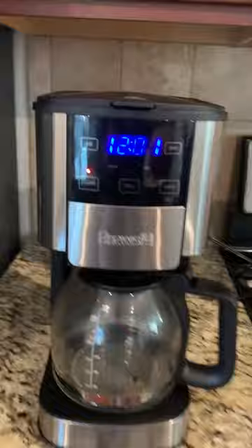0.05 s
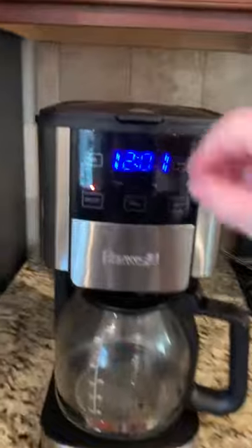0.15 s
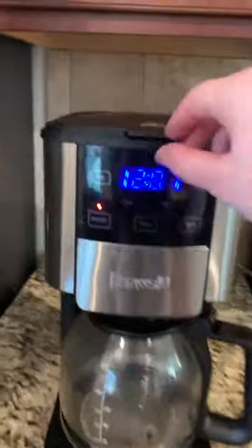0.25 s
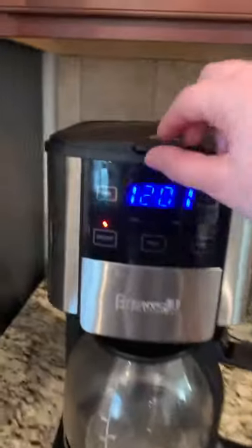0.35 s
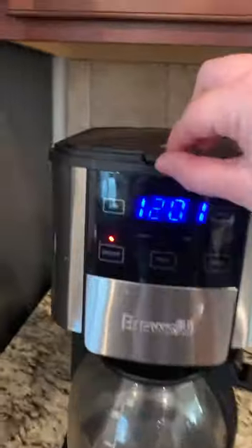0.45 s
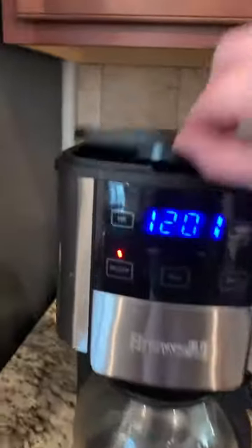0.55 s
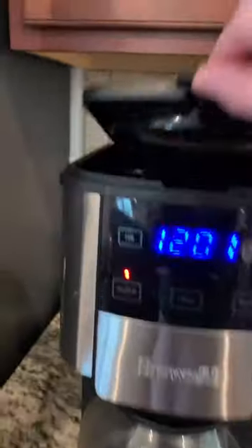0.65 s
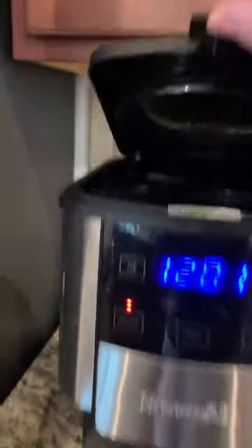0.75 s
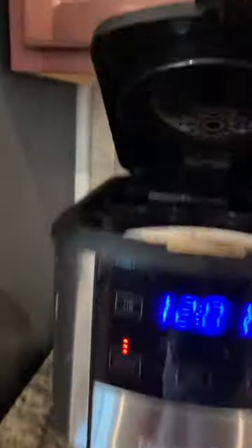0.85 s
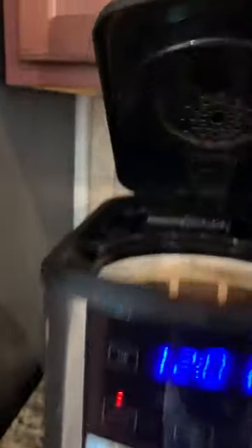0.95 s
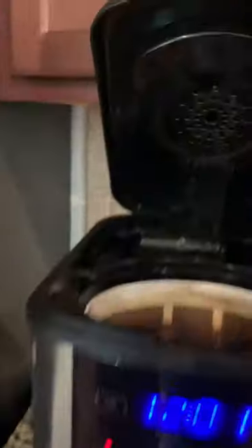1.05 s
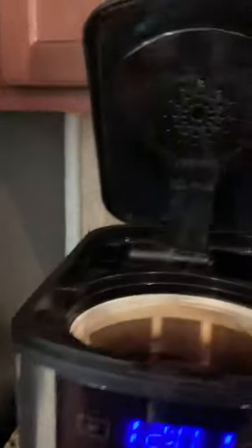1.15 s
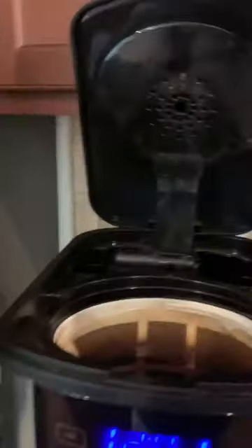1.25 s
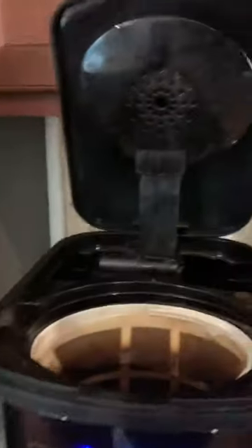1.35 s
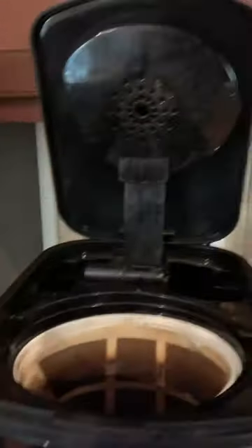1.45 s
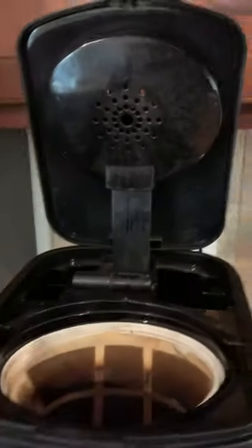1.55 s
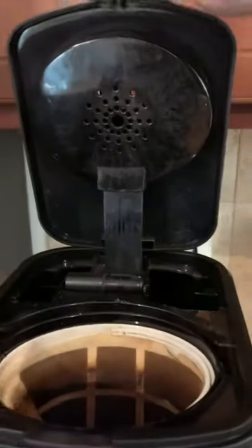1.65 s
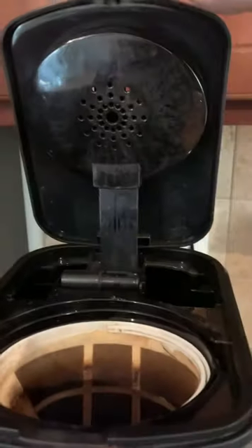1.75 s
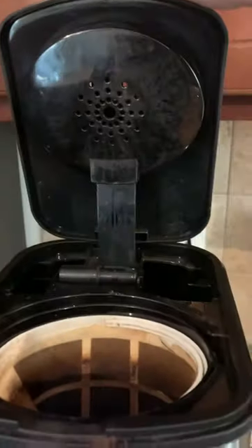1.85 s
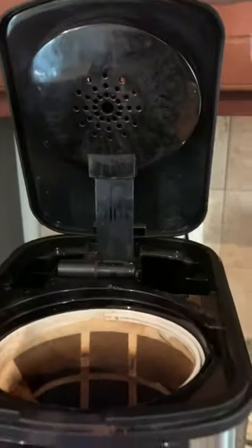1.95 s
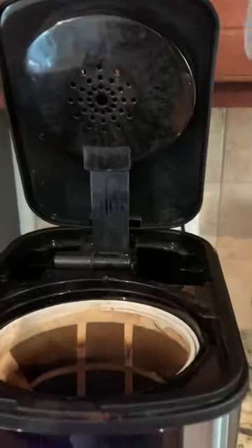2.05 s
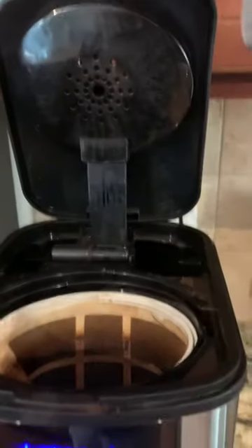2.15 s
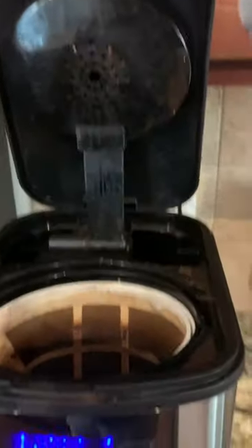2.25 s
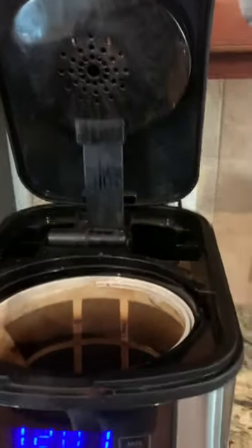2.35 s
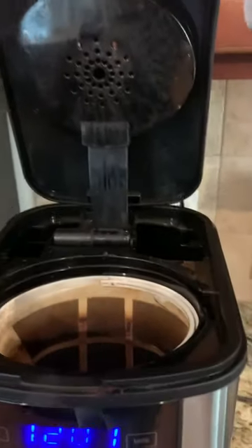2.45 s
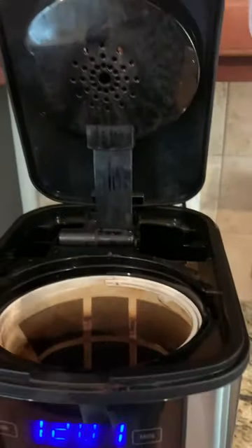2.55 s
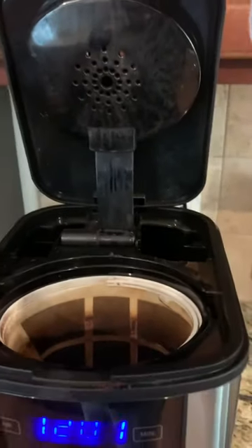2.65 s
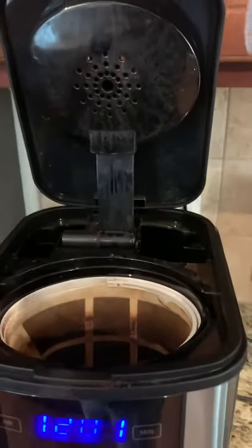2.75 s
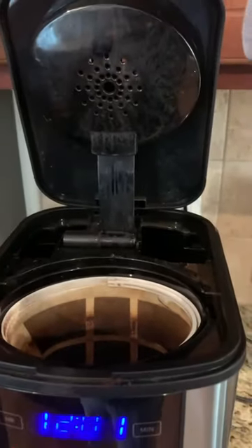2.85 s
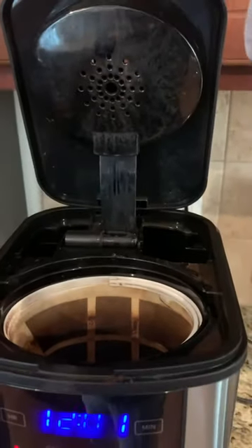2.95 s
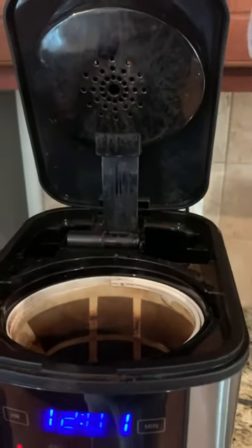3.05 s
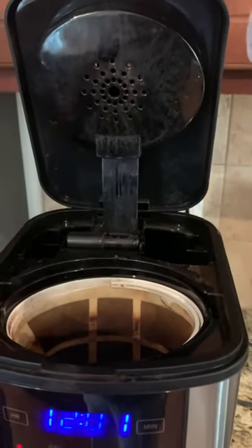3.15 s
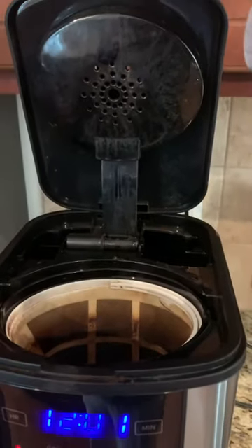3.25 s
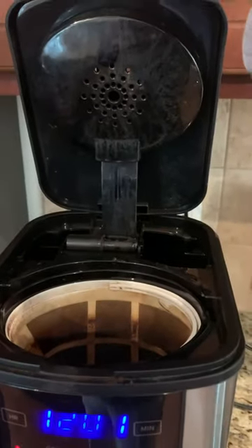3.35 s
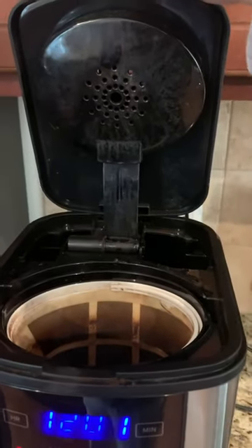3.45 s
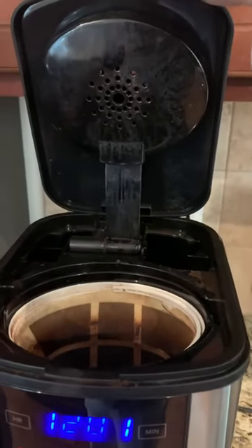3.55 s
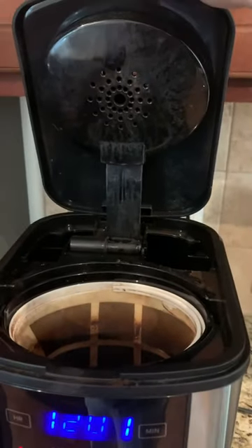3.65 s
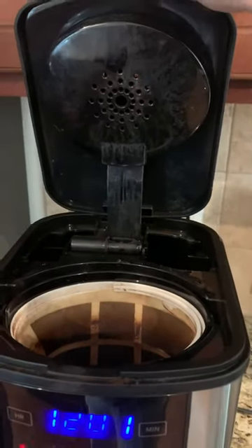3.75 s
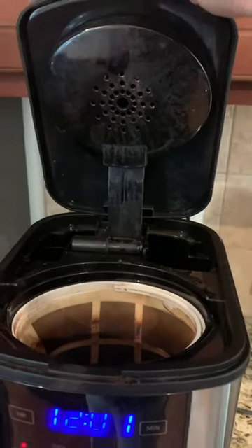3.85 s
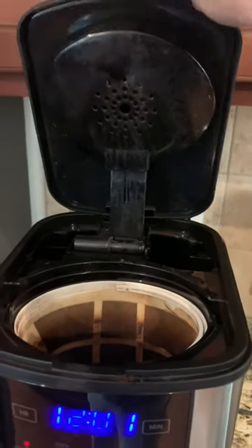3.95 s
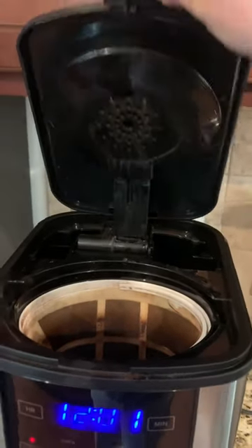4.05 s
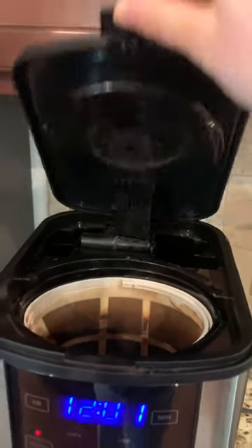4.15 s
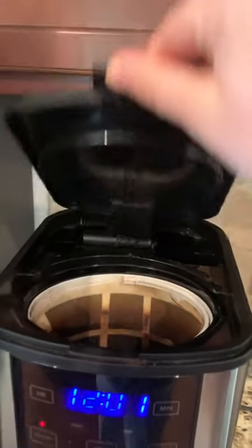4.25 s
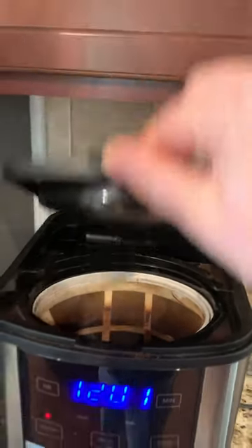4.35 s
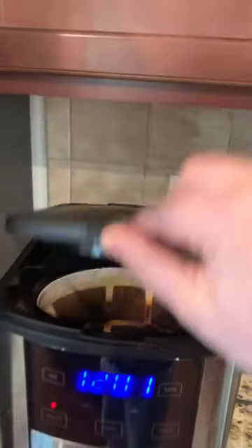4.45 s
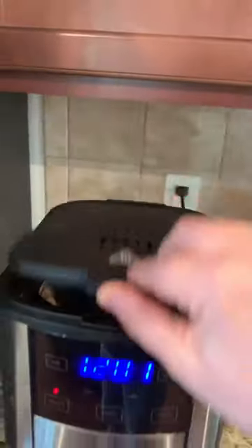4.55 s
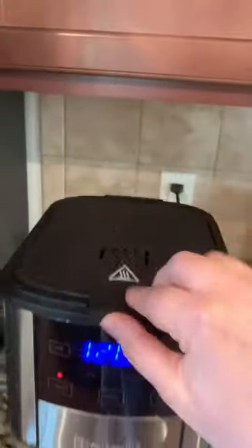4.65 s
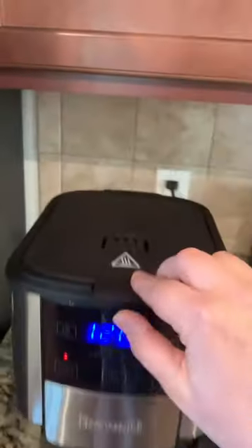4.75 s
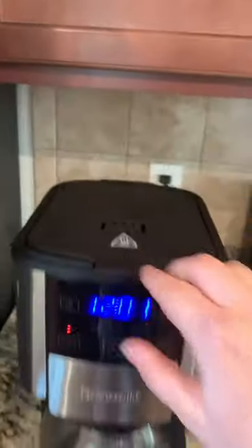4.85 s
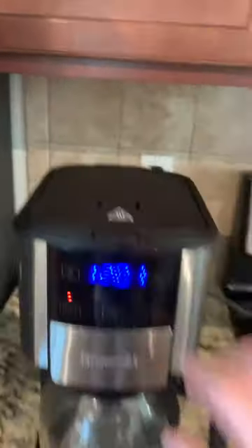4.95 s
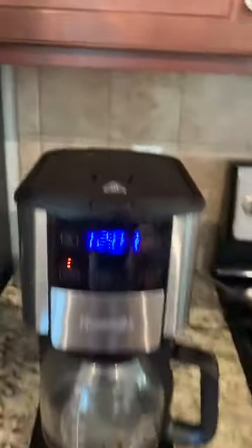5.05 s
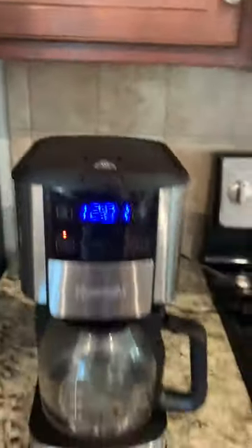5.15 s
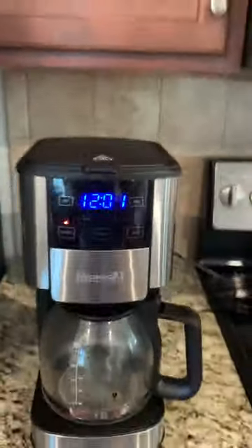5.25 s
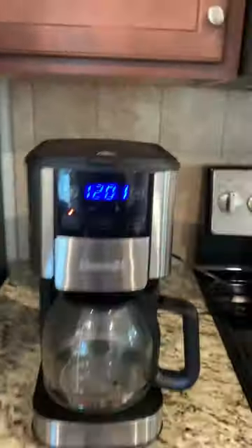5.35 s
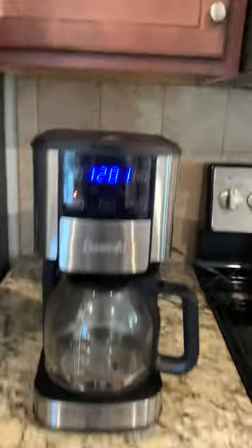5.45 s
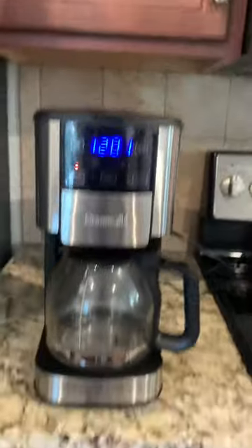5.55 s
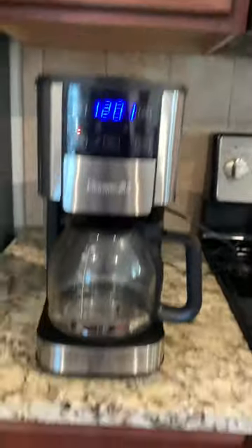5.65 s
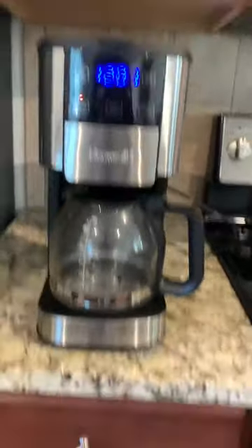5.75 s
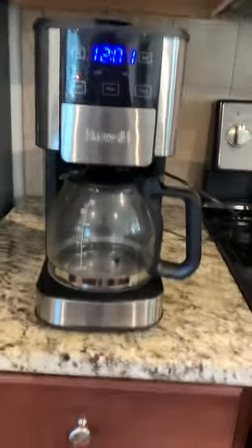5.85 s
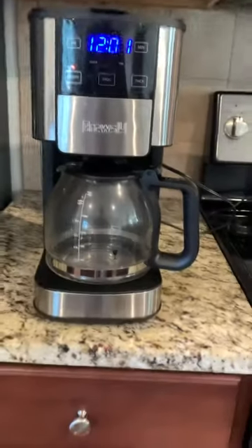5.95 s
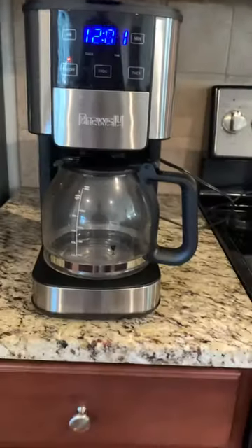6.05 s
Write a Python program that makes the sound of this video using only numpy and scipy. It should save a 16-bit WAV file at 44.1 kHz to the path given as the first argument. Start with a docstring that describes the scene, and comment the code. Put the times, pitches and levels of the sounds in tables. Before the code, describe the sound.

Light plastic cracks, a few dull floor thuds with thin metallic clinks, then a sharp lid clack, over quiet refrigerator hum and room rumble.

```python
"""Opening and shutting a coffee machine lid

The plastic lid of a kitchen coffee machine is unlatched, lifted and shut in front of a hand-held phone: short
cracks ring its hollow shell. Feet thud (gliding tones) and scuff (shaped noise) on the floor, and a loose
metal part clinks (ringing tones). A fridge hums (wavering tones) under the rumble of the house (noise)."""
import sys
import numpy as np
from scipy import signal
from scipy.fft import rfft, irfft, next_fast_len
from scipy.io import wavfile
from scipy.ndimage import uniform_filter1d, map_coordinates

SR = 44100
rng = np.random.default_rng(int(sys.argv[2]) if len(sys.argv) > 2 else 0)


def gain_from_decibels(decibels):
    """Convert decibel values to linear amplitude factors."""
    exponent = np.asarray(decibels, float) / 20
    return 10 ** exponent


def transcribe(u):
    """Save the signal u as a 16-bit wav file named by the first command-line argument.

    u: samples, shape (n,) or (channels, n), limited to [-1, 1]; the rate is SR.
    q: integer samples, one column per channel.
    """
    v = np.clip(np.atleast_2d(u).T, -1, 1)
    q = np.round(v * 32767).astype(np.int16)
    wavfile.write(sys.argv[1], SR, q)


N = 268745  # length in samples
T = np.arange(N) / SR  # time of each sample in seconds

# contacts of latch, hinge and lid: t/s, level/dB, body/dB, treble/dB, time for the crack to fall 60 dB/s
CONTACTS = [(0.129, -52, -23, -15, 0.011), (0.157, -66, -10, -24, 0.017), (.403, -40, -2.5, -27, 0.0092),
            (0.5049, -29.5, -3.5, -6.5, 0.043), (.573, -37, 1, -21.5, 0.026),
            (.649, -58.5, -7.5, -1, 0.013), (1.563, -37, 4.5, -49, 0.0026), (3.842, -55.5, 6.5, -26, .025),
            (3.911, -48.5, 10.5, -30.5, 0.075), (3.939, -24, -7, -9.5, 0.028),
            (3.953, -20, -8, -1.5, 0.012), (4.6119, -36, -7.5, -4, 0.023), (4.618, -25.5, 1.5, -6, 0.023),
            (4.622, -19.5, -2.5, -3, 0.027), (4.630, -25.5, 9, -28, 0.034),
            (5.405, -51, -19.5, 13.5, 0.045)]
# resonances of the hollow lid and housing: f/Hz, level/dB, longest time to fall 60 dB/s
LID_MODES = [(273, -8, 0.1), (338.6, -3.5, 0.099), (390, -6.5, 0.1), (423, -10.5, .15),
             (659.6, -2.5, 0.071), (943, -2.5, 0.021), (1058, -3.5, 0.041), (1122, -14.5, 0.063),
             (1617, -2.5, 0.026), (2078, -1.5, 0.019), (2532, -5.5, 0.024), (3380, -21, 0.015),
             (6380, 3, 0.0077), (9200, -25, 0.014)]
# the lid swings on its hinge: start t/s, length/s, level/dB
SWINGS = [(0.614, 0.51, -71), (3.978, 0.42, -68.5)]
# colour of the hinge whisper: f/Hz, relative level/dB
HINGE_COLOUR = [(600, -33), (1100, -4.5), (1700, -10.5), (2300, 5), (2900, -19), (6200, -19), (9000, -24)]
# thuds of feet and of the shut lid through floor and counter:
# t/s, level/dB, starting f above the lowest pitch/Hz, glide/s, time to fall 60 dB/s
THUDS = [(.083, -37.5, 293, .012, 0.22), (.135, -38, 251, 0.011, 0.16), (1.009, -40.5, 597, 0.028, 0.044),
         (1.013, -30.5, 197, 0.011, 0.26), (1.085, -29.5, 180, 0.01, 0.21),
         (1.206, -37.5, 535, 0.019, 0.039), (1.218, -29, 272.4, 0.0094, 0.34),
         (1.244, -23.5, 113.6, 0.042, 0.1224), (1.248, -38, 963, 0.037, 0.061),
         (1.277, -27, 90, 0.039, 0.27), (1.307, -30, 155, 0.027, 0.12), (1.949, -33, 252, 0.016, 0.35),
         (1.9854, -20, 1003, 0.0045, 0.098), (4.623, -28.5, 250, .01, .15),
         (4.821, -29.5, 617, 0.0045, 0.093), (4.827, -25, 682, 0.0038, 0.096),
         (5.003, -38, 245.7, 0.012, 0.14), (5.058, -29, 780, 0.007, 0.29),
         (5.109, -32.5, 250.7, 0.0088, 0.14)]
# small dull ticks as weight shifts on the boards: t/s, level/dB
TICKS = [(2.276, -46.5), (2.866, -53), (5.148, -48), (5.209, -47), (5.305, -52), (5.361, -46), (5.43, -48),
         (5.471, -45), (5.75, -49.5), (5.83, -51), (5.872, -53), (6.008, -50)]
TICK_HZ, TICK_GLIDE_S, TICK_T60_S = 1247, 0.00448, 0.053  # the last three THUDS columns, for every tick
# touches of the loose metal: t/s, level/dB, favoured f/Hz, loss away from it/dB per octave
CLINKS = [(1.742, -37, 1700, 14), (1.789, -39, 2600, 18), (1.979, -36.5, 5100, 6.5)]
# resonances of the metal: f/Hz, level/dB, time to fall 60 dB/s
METAL_MODES = [(1700, -5.5, 0.3), (2640, -8.5, 0.25), (3962, 0.5, 0.29), (6390, -12, 0.25), (6570, -7, .15),
               (6920, -2.5, 0.29), (7020, -5, 0.35), (8100, -1.5, 0.23), (10100, -22, 0.078),
               (11170, -10, 0.18), (13960, -14, 0.16)]
# strokes of soles, sleeves and the hinge rubbing: t of the peak/s, level/dB, swell/s, fade/s,
# brightness/dB per octave; swell and fade cover about 20 dB
STROKES = [(.14, -69.5, 0.064, 0.042, -1.5), (.265, -60, 0.089, 0.076, -6.5),
           (.62, -71.5, 0.41, 0.23, -0.5), (.92, -87.5, 0.42, 0.56, 7), (1.75, -47.5, 0.012, 0.13, 4),
           (1.81, -46.5, 0.095, 0.1, -3.5), (1.91, -50, 0.039, 0.098, -5), (1.986, -42.5, 0.01, .12, -2.5),
           (3.037, -57, 0.011, 0.073, 2), (3.115, -54, 0.082, 0.09, -6.5), (3.925, -62, .07, 0.062, -16.5),
           (4.24, -70, 0.34, 0.17, -2.5), (4.391, -68.5, 0.28, 0.061, -9.5), (5.2, -66, 0.031, 0.23, -15),
           (5.335, -50.5, 0.12, .13, -3.5)]
RUSTLE_DB, RUSTLE_BRIGHT = -80.5, -1.5  # clothes never quite still: level/dB, brightness/dB per octave
# colour of rubbing: f/Hz, relative level/dB
RUB_COLOUR = [(150, -27.5), (400, 0), (1200, 2), (1700, 5), (2600, -0.5), (4500, 0), (7000, -4),
              (9000, -13.5), (12000, -16), (16000, -28)]
# fridge tones: f/Hz, waver/Hz, relative level/dB
HUM_TONES = [(57.5, 3, -1), (235.2, 1, 2.5), (281.5, 1.5, 1.5), (322, 2, -17), (386, 2, -12),
             (462, 4, -18.5), (558, 2.25, -6.5), (3460, 9.4, -29.5), (3610, 34, -30.5), (3850, 17, -33)]
# background as the phone moves about: t/s, rumble level/dB, air level/dB, hum level/dB
HOUSE_LEVELS = [(0, -57.5, -59, -56.5), (.4, -53, -56.5, -58), (.8, -53.5, -57, -51.5),
                (1.19, -46, -60, -52), (1.45, -55.5, -57.5, -54.5), (1.95, -50.5, -58, -51),
                (2.6, -55.5, -59, -55.5), (3.8, -54, -59.5, -52), (4.12, -52.5, -54.5, -49.5),
                (4.55, -53, -56.5, -54), (5.0, -53.5, -62, -57.5), (5.35, -54.5, -59.5, -67),
                (6.09, -59, -59.5, -55.5)]
# colour of the house rumble: f/Hz, relative level/dB
RUMBLE_COLOUR = [(15, -31), (28, -9.5), (58, 6), (80, -5.5), (143, -2), (180, -6.5), (260, -8), (400, -55)]
# colour of the air noise: f/Hz, relative level/dB
AIR_COLOUR = [(150, -31), (230, 3.5), (300, 9), (430, 1), (560, -0.5), (700, -3), (860, -14.5),
              (1100, -8.5), (1350, -6.5), (1650, -26), (2500, -35), (4000, -62.5)]
# colour of the microphone hiss: f/Hz, relative level/dB
HISS_COLOUR = [(1200, -4), (2000, -8), (3400, 8.5), (5000, -7), (8000, -1), (12500, -0.5), (15300, -3.5),
               (16200, -39)]
# echo of the kitchen: f/Hz, time to fall 60 dB/s
KITCHEN = [(200, 0.38), (1000, 0.42), (4000, 0.23), (12000, 0.14)]
# left minus right for lid, thuds and clinks: level/dB
PAN_DB = [-1, 4, 0.5]
# likeness of left and right in the diffuse sound: f/Hz, likeness (1 = identical)
ALIKE = [(60, 1), (400, 0.66), (1000, 0.14), (2500, 0.58), (4500, 1), (15000, 1)]
# the phone's stereo timing: f/Hz, lead of the left side/radians
LEAD = [(0, 0.5), (800, -1.12), (1300, 1.06), (2100, 1.97), (3500, 1.5), (4700, 3), (16000, 20)]
# the phone's stereo balance: f/Hz, left minus right level/dB
TILT = [(60, -2), (500, -4), (1500, -2), (3000, -0.5), (5000, 0.5)]
# frequency response of the microphone: f/Hz, level/dB
MIC = [(20, -7), (45, -1.5), (13000, -0.5), (16500, -10.5)]


def unit(x):
    """Scaled to an rms of 1."""
    return x / np.sqrt(np.mean(x ** 2) + 1e-20)


def along(points, hz):
    """Reads (f/Hz, value) points on a log frequency axis."""
    f, v = np.transpose(points)
    return np.interp(np.log(hz + 1), np.log(f + 1), v)


def curves(rows):
    """One value per sample for each column after the time."""
    s, *columns = np.transpose(rows)
    return [np.interp(T, s, column) for column in columns]


def wobble(rate, t=T):
    """A smooth random curve with rate knots a second."""
    knots = rng.standard_normal(int(t[-1] * rate) + 4)
    return map_coordinates(knots, [t * rate])


def filtered(x, response):
    """Multiplies the spectrum of x by a response that depends on frequency."""
    m = next_fast_len(x.shape[-1] + 8192)  # spare room for the ringing
    spectrum = rfft(x, m) * response(np.fft.rfftfreq(m, 1 / SR))
    return irfft(spectrum, m)[..., :x.shape[-1]]


def noise(colour, channels=2):
    """Unrelated noises of one colour, with an rms of 1."""
    white = rng.standard_normal((channels, N))
    return unit(filtered(white, lambda hz: gain_from_decibels(along(colour, hz))))


def add(track, s, sound):
    """Mixes a sound into the track at s seconds."""
    part = track[..., round(s * SR):][..., :sound.shape[-1]]
    part += sound[..., :part.shape[-1]]


def room(x):
    """Two unrelated noise tails echo the sound; each frequency dies at its own speed."""
    hz, t, z = signal.stft(rng.standard_normal((2, SR // 2)), SR, nperseg=256)
    decay = gain_from_decibels(-60 * t / along(KITCHEN, hz)[:, None])
    tail = signal.istft(z * decay, SR, nperseg=256)[1]
    late = np.pad(x, (150, 0))  # the echo starts 150 samples after the sound
    return signal.fftconvolve(late[None], tail / np.linalg.norm(tail[0]), axes=1)


def lid(crack_db=6, wet_db=-15):
    """Each contact is a short crack that rings the plastic; its firmness sets body and treble."""
    near, far, t = np.zeros(N), np.zeros((2, N)), T[T < .25]
    for s, db, body_db, treble_db, t60 in CONTACTS:
        # a finger resting on the plastic damps the light touches
        free = np.clip(2.0 + (db + 29.5) / 25, .35, 1)
        ring = 0
        for hz, level, life in LID_MODES:
            fading = gain_from_decibels(level + rng.normal(0, 1.5) + 2 * wobble(180, t) - 60 * t / (life * free))
            ring = ring + fading * np.sin(2 * np.pi * hz * rng.normal(1, 0.016) * t)
        crack = gain_from_decibels(crack_db - 60 * t / np.clip(t60, .003, 1)) * rng.standard_normal(len(t))
        onset = 1 - np.exp(-t / 0.00043)
        colour = [(100, body_db - 11.5), (250, body_db), (560, body_db), (850, 0.006), (3500, 0.0067),
                  (6000, treble_db), (9000, treble_db - 1.5), (16000, treble_db - 7)]
        hit = gain_from_decibels(db) * filtered((ring + crack) * onset, lambda hz: gain_from_decibels(along(colour, hz)))
        add(near, s, hit)
        add(far, s, gain_from_decibels(wet_db) * room(hit))
    return near, far


def steps(wet_db=-14, floor_hz=45, attack_cycles=0.69, dull_hz=1900):
    """Boards carry high pitches faster than low ones, so each thud glides down towards floor_hz."""
    near, t = np.zeros(N), T[T < .25]
    ticks = [(s, db, TICK_HZ, TICK_GLIDE_S, TICK_T60_S) for s, db in TICKS]
    for s, db, hz, glide, t60 in list(THUDS) + ticks:
        cycles = hz * glide * t / (t + glide) + floor_hz * t
        fading = gain_from_decibels(db + 1.5 * wobble(70, t) - 60 * t / t60)
        onset = 1 - np.exp(-t * hz / attack_cycles)
        add(near, s, fading * onset * np.sin(2 * np.pi * cycles))
    near = filtered(near, lambda hz: 1 / (1 + 1j * hz / dull_hz) ** 4)  # dulls the treble
    return near, gain_from_decibels(wet_db) * room(near)[:, :N]


def clinks(wet_db=-8):
    """Thin metal rings on after each touch, unevenly, with a short rattle at the start."""
    near, t = np.zeros(N), T[T < .5]
    for s, db, best_hz, loss_db in CLINKS:
        ring = 0
        for hz, level, t60 in METAL_MODES:
            start_db = level - loss_db * abs(np.log2(hz / best_hz)) + rng.normal(0, 1.2)
            fading = gain_from_decibels(start_db - 60 * t / t60 + 4.9 * wobble(81, t))
            ring = ring + fading * np.sin(2 * np.pi * hz * t)
        rattle = .5 * gain_from_decibels(-60 * t / 0.045) * np.diff(rng.standard_normal(len(t) + 1))
        onset = 1 - np.exp(-t / 0.0013)
        add(near, s, gain_from_decibels(db) * (ring + rattle) * onset)
    return near, gain_from_decibels(wet_db) * room(near)[:, :N]


def scuffs(grain_db=1.36, patchy_db=3.5, turn_hz=1900, crest=0.22):
    """Rough rubbing noise with shifting resonances; each stroke swells, fades and has its own brightness."""
    z = signal.stft(noise(RUB_COLOUR), nperseg=256)[2]
    # random patches over frequency and time make the resonances shift
    patches = uniform_filter1d(rng.standard_normal(z.shape[1:]), size=3, axis=0)
    patches = uniform_filter1d(patches, size=18, axis=1)
    grit = signal.istft(z * gain_from_decibels(patchy_db * unit(patches)), nperseg=256)[1][:, :N]
    grit = unit(grit * gain_from_decibels(grain_db * wobble(200)))

    s, db, swell, fade, bright = np.transpose(STROKES)[..., None]
    away = np.maximum((s - T) / swell, (T - s) / fade)
    force = gain_from_decibels(db - 20 * (np.hypot(away, crest) - crest))  # rounded crests

    # overlapping octave bands from turn_hz up, each tilted by the brightness of the strokes under way
    octaves = np.arange(4)
    total = 0
    for k, row in zip(octaves, np.eye(len(octaves))):
        band = filtered(grit, lambda hz: np.interp(np.log2(hz / turn_hz + 1e-9), octaves, row))
        strokes = gain_from_decibels(bright[:, 0] * k) @ force
        rustle = gain_from_decibels(RUSTLE_DB + RUSTLE_BRIGHT * k)
        total = total + (strokes + rustle) * band
    return total


def hinge(flutter_db=3):
    """A soft fluttering whisper that follows the speed of the swing."""
    speed = 0
    for s, length, db in SWINGS:
        speed = speed + gain_from_decibels(db) * np.sin(np.pi * np.clip((T - s) / length, 0, 1))
    return speed * gain_from_decibels(flutter_db * wobble(25)) * noise(HINGE_COLOUR)


def fridge():
    """Motor tones whose pitch and strength waver a little, separately on each side."""
    sides = np.zeros((2, N))
    for side in sides:
        for hz, waver, db in HUM_TONES:
            strength = gain_from_decibels(db + 1.8 * wobble(8))
            phase = 2 * np.pi * np.cumsum(hz + waver * wobble(30)) / SR
            side += strength * np.sin(phase + rng.uniform(0, 2 * np.pi))
    return unit(sides)


def house():
    """Slowly varying noises for rumble, air and microphone hiss, joined by the fridge hum."""
    rumble_db, air_db, hum_db = curves(HOUSE_LEVELS)
    rumble = gain_from_decibels(rumble_db + 2.43 * wobble(6.57)) * noise(RUMBLE_COLOUR)
    air = gain_from_decibels(air_db + 0.92 * wobble(12.0)) * noise(AIR_COLOUR)
    hum = gain_from_decibels(hum_db) * fridge()
    hiss = gain_from_decibels(-83.0 + 0.33 * wobble(5.7)) * noise(HISS_COLOUR)
    return rumble + air + hum + hiss


def scene():
    """Near sounds differ between the sides only in level; diffuse ones are as alike as ALIKE says."""
    nears, fars = zip(lid(), steps(), clinks())
    near = sum(gain_from_decibels([[db / 2], [-db / 2]]) * sound for db, sound in zip(PAN_DB, nears))
    diffuse = sum(fars) + scuffs() + hinge() + house()

    def mid_side(hz):
        angle = np.arccos(np.clip(along(ALIKE, hz), -1, 1)) / 2
        return np.array([np.cos(angle), np.sin(angle)])

    mid, side = filtered(diffuse, mid_side)
    return near + np.array([mid + side, mid - side])


def low_pass(x):
    """Removes everything above the highest recorded frequency."""
    return signal.sosfilt(signal.butter(12, 16660, fs=SR, output="sos"), x)


def record(dry):
    """The phone colours the sound and spreads its stereo by phase and level."""
    def phone(hz):
        # half of the stereo difference goes to each side
        half = gain_from_decibels(along(TILT, hz) / 2) * np.exp(.5j * np.interp(hz, *np.transpose(LEAD)))
        return gain_from_decibels(along(MIC, hz)) * np.array([half, 1 / half])

    wide = filtered(dry, phone)
    return low_pass(wide)


dry = scene()
out = record(dry)
transcribe(out)
```